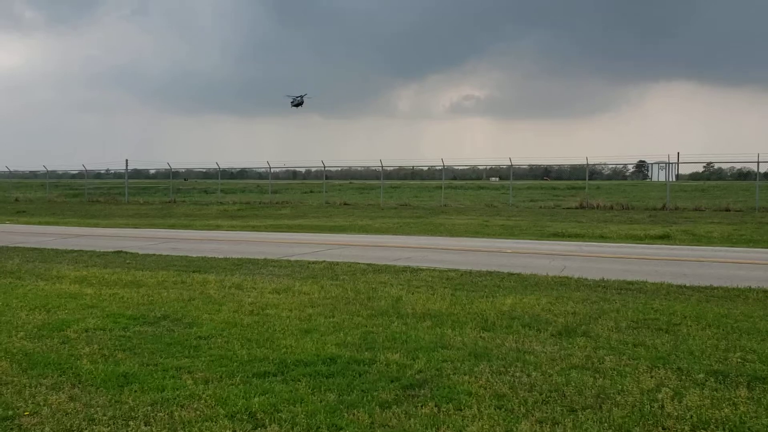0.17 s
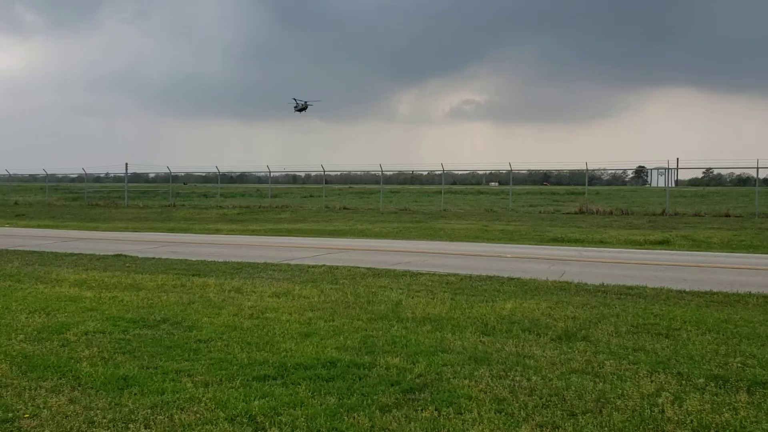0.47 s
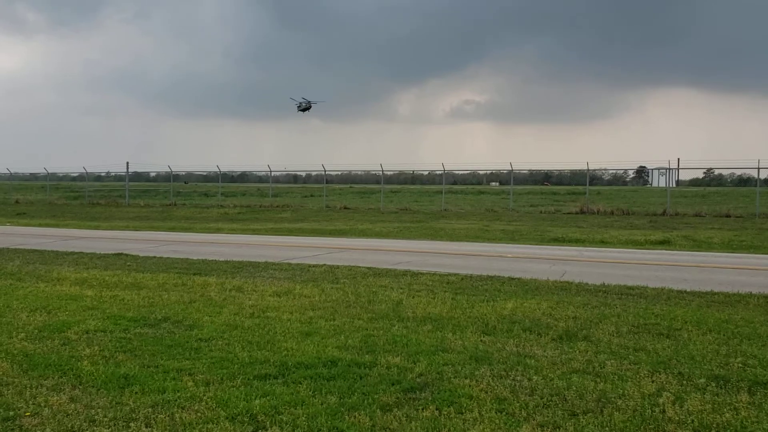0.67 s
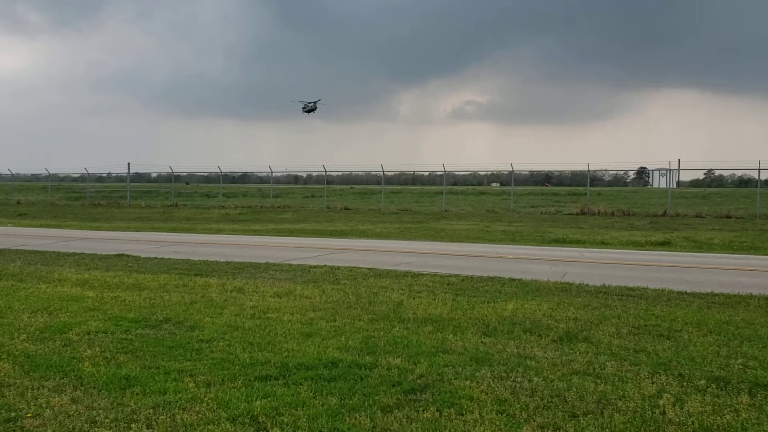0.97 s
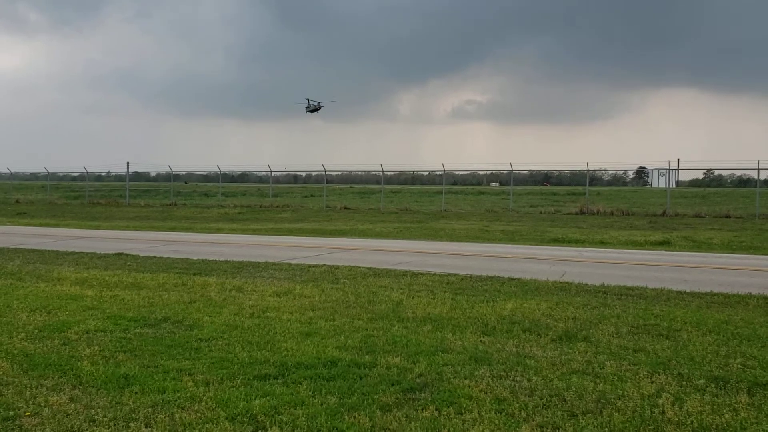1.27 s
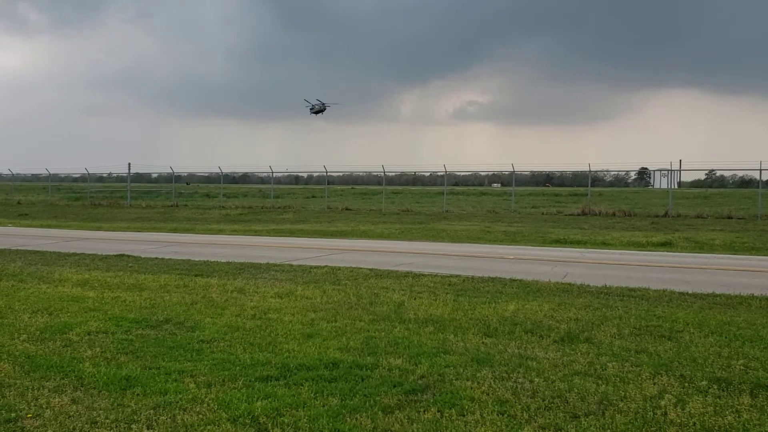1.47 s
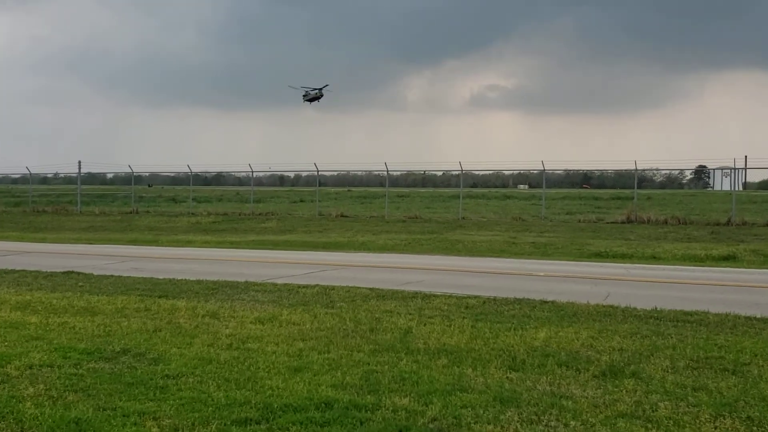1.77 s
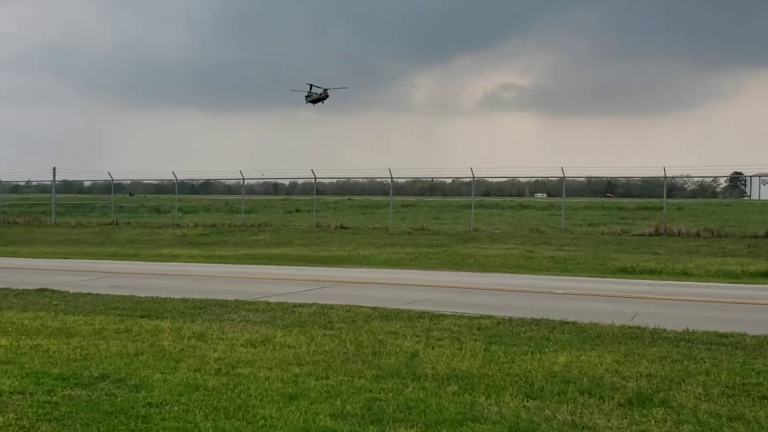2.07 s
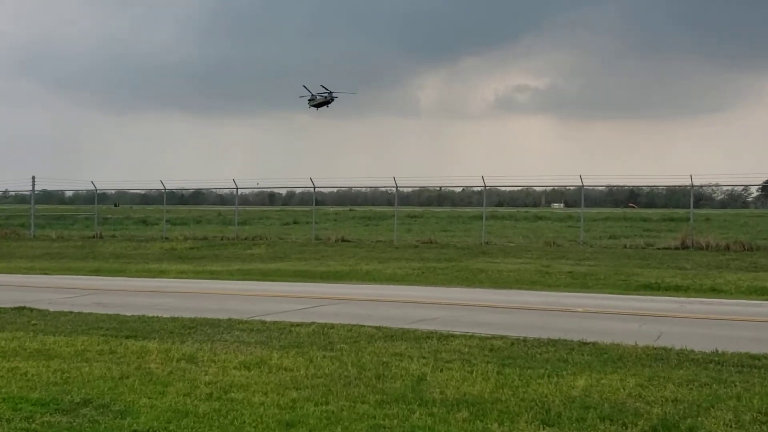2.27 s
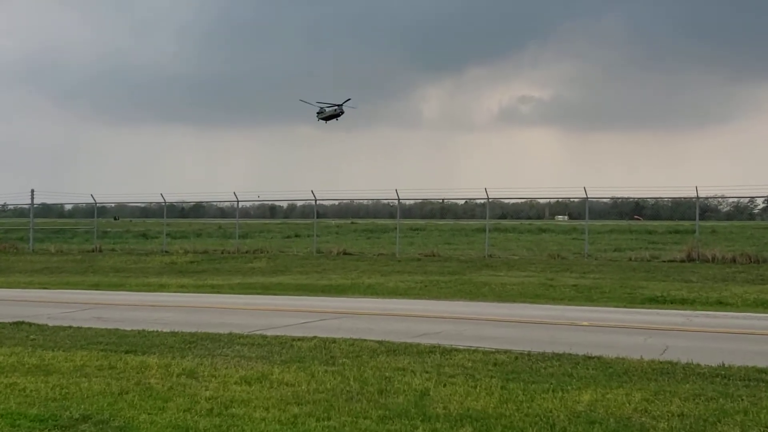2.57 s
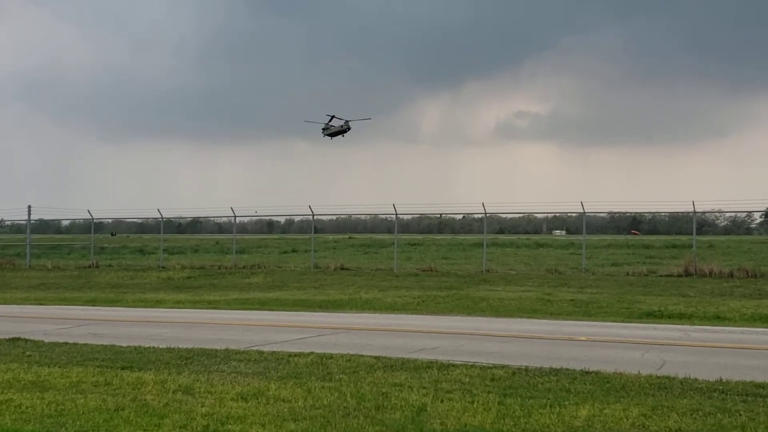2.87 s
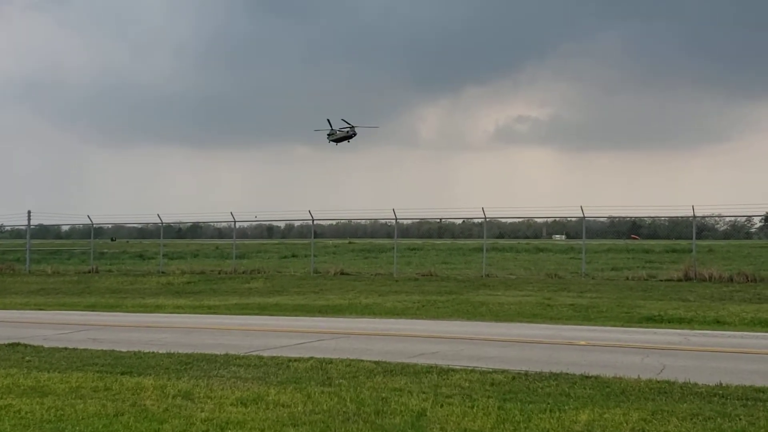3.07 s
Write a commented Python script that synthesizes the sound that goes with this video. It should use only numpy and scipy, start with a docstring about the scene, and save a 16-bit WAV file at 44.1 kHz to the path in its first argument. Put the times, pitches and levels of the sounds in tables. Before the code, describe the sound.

A twin-rotor helicopter approaches over an open airfield, its blades beating rapidly over a faint turbine roar. Wind buffets the microphone at first and keeps rumbling, while the engine whine and rotor slaps grow louder toward the end.

```python
"""A twin-rotor helicopter approaches across an open airfield, heard on a phone held in the wind.
Out on the field, blades slap the air about twelve times a second over turbine roar, gear tones and a
compressor whine. Low thuds reach both microphone ports; right at the phone, wind rumbles and buffets
each port, with a few thin ticks and a faint hiss. The sound starts abruptly."""
import sys
import numpy as np
from scipy import signal
from scipy.fft import rfft, irfft, next_fast_len
from scipy.io import wavfile
from scipy.ndimage import uniform_filter1d

SR = 44100
rng = np.random.default_rng(int(sys.argv[2]) if len(sys.argv) > 2 else 0)


def generate_wav(sig):
    """Save sig (samples, or channels by samples) to the path in sys.argv[1] as 16-bit PCM at SR."""
    pcm = np.round(np.clip(np.atleast_2d(sig).T, -1, 1) * 32767).astype(np.int16)
    wavfile.write(sys.argv[1], SR, pcm)


N = 141561
BLADE_HZ, BLADES = 11.8, 3  # blade passes a second, blades on a rotor
LEAD_S, ENGINE_LEAD_S = 6.5e-5, 5.2e-5  # the left port hears the helicopter first
START_S, TOP_HZ = .1055, 15750


def undb(db):
    """Gain of a level."""
    return 10 ** (np.asarray(db) / 20)


def curve(table, column):
    """One column of a table along time."""
    rows = np.array(table, float)
    return np.interp(np.arange(N) / SR, rows[:, 0], rows[:, column])


def walk(rate):
    """Random levels held 1 / rate s and slewed twice; spread 1."""
    hold = int(SR / rate)
    steps = np.repeat(rng.standard_normal(N // hold + 3), hold)
    smooth = uniform_filter1d(uniform_filter1d(steps, hold), hold)[hold:N + hold]
    return smooth / smooth.std()


def pan(db):
    """Left and right gains for a level difference."""
    return undb(np.array([db, -db]).reshape(2, -1) / 2)


def port_leads(lead_s):
    """Left and right time shifts for an arrival difference."""
    return lead_s * np.array([[.5], [-.5]])


def burst(age, rise, fall):
    """Envelope with a rounded rise and an exponential fall."""
    age = np.maximum(age, 0)
    return 2 * (1 - np.exp(-age / rise)) ** 2 * np.exp(-age / fall)


def bands(colour, alike, flicker_db, count, lead_s=LEAD_S):
    """Stereo noise as (centre Hz, band) pairs, each flickering; the ports share `alike` of the power."""
    size = next_fast_len(N)
    hz = np.maximum(np.arange(size // 2 + 1) * SR / size, 1)
    colour_hz, colour_db = np.array(colour, float).T
    log_hz, log_points = np.log(hz), np.log(colour_hz)
    white = rfft(rng.standard_normal((3, size)))
    shared = white[0] * np.exp(2j * np.pi * hz * port_leads(lead_s))
    spectrum = np.sqrt(alike) * shared + np.sqrt(1 - alike) * white[1:]
    spectrum *= undb(np.interp(log_hz, log_points, colour_db))
    spectrum /= irfft(spectrum, size).std()
    centres, step = np.linspace(log_points[0], log_points[-1], count, retstep=True)
    out = []
    for centre in centres:
        window = np.clip(1 - np.abs(log_hz - centre) / step, 0, 1)
        band = irfft(spectrum * window, size)[:, :N]
        out.append((np.exp(centre), band * undb(flicker_db * walk(14))))
    return out


def noise(colour, alike, flicker_db, count):
    """Coloured stereo noise: all its flickering bands together."""
    return sum(band for _, band in bands(colour, alike, flicker_db, count))


def narrow(hz, width_hz):
    """Noise crowded around a centre that may move, rms 1."""
    angle = 2 * np.pi * (np.cumsum(hz) / SR + hz * port_leads(LEAD_S))
    return walk(width_hz) * np.cos(angle) + walk(width_hz) * np.sin(angle)


def tone(hz, wander_hz, fade_db, fade_rate):
    """A tone that wavers and fades on its way through the air, reaching the left port first."""
    turns = np.cumsum(hz + wander_hz * walk(40)) / SR + rng.random()
    return undb(fade_db * walk(fade_rate)) * np.sin(2 * np.pi * (turns + hz * port_leads(ENGINE_LEAD_S)))


# colour of the turbine roar from across the field (frequency [Hz], level [dB])
ROAR_COLOUR = [(590, -9), (1000, -6), (1080, -28), (1200, -4), (1350, -12.5), (1520, -4.5), (1690, -6),
               (2100, -13.5), (2550, -19), (3100, -11.5), (3840, -9), (4730, -13.5), (6180, -21),
               (7400, -22), (8000, -20.5), (8600, -35.5), (11000, -37.5), (16000, -52)]
# dips and swells within the roar (time [s], level near 3.4 kHz [dB], level near 2.5 kHz [dB])
ROAR_SWELLS = [(.11, -2, -2.5), (1.3, 6, -6), (1.6, 1, -5), (2.0, 0, 2.5), (2.55, -4, 2), (2.72, -4, 2),
               (3.21, -1, -1.5)]
# bands where the roar crowds together (centre [Hz], width [Hz], level [dB])
ROAR_HUMS = [(1536, 200, -13), (1974, 100, -20), (2390, 220, -20), (2738, 230, -15.5), (3566, 250, -16),
             (3833, 560, -13)]
def roar(t):
    """Broad turbine noise with drifting hums in it, swelling with each blade."""
    upper, lower = curve(ROAR_SWELLS, 1), curve(ROAR_SWELLS, 2)
    swell_db = {6: lower, 7: lower, 8: upper}  # by band number
    parts = bands(ROAR_COLOUR, alike=.45, flicker_db=2.5, count=16, lead_s=ENGINE_LEAD_S)
    out = sum(band * undb(swell_db.get(k, 0)) for k, (_, band) in enumerate(parts))
    for hz, width_hz, db in ROAR_HUMS:
        level_db = db + 1.5 * walk(4.8) + (2200 < hz < 3000) * lower
        out += undb(level_db) * narrow(hz * (1 + .008 * walk(2)), width_hz)
    beat_db = 2 * np.cos(2 * np.pi * BLADE_HZ * (t - .004))
    return out * undb(beat_db)


def whine(hz=7684.5, skirt_hz=120):
    """The compressor's high tone inside a skirt of noise."""
    colour = [(20, -120), (hz - 4 * skirt_hz, -16), (hz - skirt_hz, -6), (hz, 0),
              (hz + skirt_hz, -7), (hz + 3 * skirt_hz, -30), (TOP_HZ, -120)]
    skirt = noise(colour, alike=.45, flicker_db=3.85, count=2)
    return undb(5) * tone(hz, wander_hz=2.5, fade_db=2.5, fade_rate=34.6) + undb(2) * skirt


# pitches of the gears (frequency [Hz])
GEAR_PITCHES = [1180, 1475.3, 1771.3, 1871.5, 2077, 2364, 3740]
# strength and waver of each of those pitches (level [dB], wander [Hz])
GEAR_TONES = [(-9.5, 3.9), (-3.5, 2.44), (-9, 3.7), (-10.5, 6), (-14, 2.9), (-12, 9.9), (-13, 12)]
def gears():
    """Gears sing in tones that each fade on their own across the field."""
    return sum(undb(db - 3) * tone(hz, wander_hz, fade_db=3, fade_rate=10.65)
               for hz, (db, wander_hz) in zip(GEAR_PITCHES, GEAR_TONES))


# the engines nearing the phone (time [s], roar level [dB], whine level [dB], gear level [dB])
ENGINE_APPROACH = [(0.11, -46, -51.5, -54), (0.13, -48, -66, -59), (0.28, -45.5, -60, -54),
                   (0.36, -49, -69, -61), (0.7, -48, -57.5, -72), (1.14, -50, -66.5, -70),
                   (1.29, -46.5, -58, -52), (1.58, -51.5, -64.5, -53.5), (1.65, -46.5, -56, -47),
                   (1.95, -43.5, -59, -46), (2.4, -42.5, -53.5, -48.5), (2.53, -40.5, -42.5, -43.5),
                   (2.69, -41.5, -55.5, -47.5), (2.72, -42, -54, -44), (2.84, -40.5, -51, -39.5),
                   (2.9, -41, -50, -36), (3.06, -38.5, -46.5, -36), (3.12, -43, -56, -48),
                   (3.15, -40, -49.5, -38), (3.21, -43, -58, -45)]
def turbines(t):
    """Roar, whine and gears grow unevenly louder as the helicopter closes in."""
    return (roar(t) * undb(curve(ENGINE_APPROACH, 1))
            + whine() * undb(curve(ENGINE_APPROACH, 2))
            + gears() * undb(curve(ENGINE_APPROACH, 3)))


# a moving band of the roar (time [s], centre [Hz], level [dB])
ROAR_SLIDE = [(2.55, 2464, -56), (2.68, 2340, -45), (2.8, 2000, -45), (2.9, 1600, -42), (3.06, 1481, -48),
              (3.21, 1470, -54)]
def sliding_roar():
    """A faint band of the roar that swells and slides down near the end."""
    return narrow(curve(ROAR_SLIDE, 1), width_hz=850) * undb(curve(ROAR_SLIDE, 2))


# rotor hiss reaching the phone (time [s], level [dB])
ROTOR_SWISH = [(.11, -74), (1.1, -72), (1.3, -68), (2.3, -71), (2.6, -65), (3.05, -60), (3.21, -62)]
def swish(t, hz=10400, width_hz=1200, width_s=.009):
    """High hiss that sweeps past once per rotor turn."""
    turn_s = BLADES / BLADE_HZ
    from_pass_s = (t - .003 + turn_s / 2) % turn_s - turn_s / 2
    sweep = np.exp(-.5 * (from_pass_s / width_s) ** 2)
    colour = [(20, -120), (hz - 2 * width_hz, -30), (hz - width_hz, -2),
              (hz + width_hz, -3), (hz + 2 * width_hz, -18), (TOP_HZ, -26)]
    return noise(colour, alike=.2, flicker_db=0, count=2) * sweep * undb(curve(ROTOR_SWISH, 1))


# colour of wind right on the microphone (frequency [Hz], level [dB])
RUMBLE_COLOUR = [(12, -41), (25, -9), (36, -3), (50, 3.5), (91, -2.5), (129, -3), (172, -6), (250, -6.5),
                 (360, -8.5), (424, -10.5), (841, -18.5), (1350, -34.5), (1950, -42), (3300, -100)]
# wind in the ports (time [s], level below 300 Hz [dB], left minus right [dB], level above 300 Hz [dB])
PORT_WIND = [(0.11, -32, -14.0, -81), (0.16, -22.5, -7.5, -77), (0.23, -32.5, -15.5, -44),
             (0.27, -21.5, -5.5, -42), (0.33, -22.5, 7, -40), (0.44, -27, -3, -36.5),
             (0.57, -30.5, 1.5, -41), (0.78, -32.5, 1.5, -41.5), (1.01, -33, 4.5, -47),
             (1.16, -30.5, 2, -40), (1.31, -29, 3.5, -44.5), (1.45, -29, -1, -45), (1.53, -38, 5.5, -49),
             (1.63, -35, -8, -49.5), (1.68, -31, 2, -41.5), (1.8, -32.5, -0.5, -42.5),
             (2.31, -31.5, 2, -48), (2.7, -34, 3.5, -42), (2.73, -31, -3, -46), (2.86, -35.5, 1, -40),
             (3.12, -27.5, -4, -37), (3.21, -35, 2.5, -36)]
# hard buffets, mostly on the right port (time [s], level [dB], left minus right [dB], decay [s])
PORT_BUFFETS = [(0.1, -27, -19.5, 0.018), (0.15, -19.5, -15.5, 0.0062), (0.2, -19, -18.5, 0.004),
                (0.226, -28.5, -15.5, 0.014), (0.25, -37, -7, 0.034), (0.29, -37, -3, 0.0079),
                (0.384, -44, 0, 0.0035), (1.453, -44, 0, 0.0065)]
def wind(t):
    """Wind rumbles on each port in its own quick gusts and buffets; the rumble throbs with the blades."""
    parts = bands(RUMBLE_COLOUR, alike=.33, flicker_db=1, count=10, lead_s=0)
    low = sum(band for hz, band in parts if hz <= 300)
    high = sum(band for hz, band in parts if hz > 300)
    low, high = low / low.std(), high / high.std()
    gusts = undb(3 * np.array([walk(22), walk(22)]))
    throb = np.cos(2 * np.pi * BLADE_HZ * (t + .002))
    rumble = low * undb(curve(PORT_WIND, 1) + throb) + high * undb(curve(PORT_WIND, 3) + 3 * throb)
    buffets = sum(pan(pan_db) * undb(db) * burst(t - at, rise=.0042, fall=decay)
                  for at, db, pan_db, decay in PORT_BUFFETS)
    return rumble * gusts * pan(curve(PORT_WIND, 2)) + buffets * (high + .5 * low)


# colour of the background hiss (frequency [Hz], level [dB])
HISS_COLOUR = [(6000, -38), (8500, -1.5), (11000, -4.5), (13000, -11), (16000, -11.5)]
def hiss():
    """Faint treble hiss that flickers behind everything."""
    return undb(-74) * noise(HISS_COLOUR, alike=.27, flicker_db=1.7, count=4)


# low thuds at the phone (time [s], level [dB], pitch [Hz], length [s], left minus right [dB])
LOW_THUDS = [(0.112, -15, 107, 0.029, -14), (0.16, -17, 100, 0.055, -1.5), (0.26, -16, 105.6, 0.058, 3),
             (0.322, -17, 77, 0.068, 12), (0.368, -21.5, 119, 0.03, -7), (0.413, -45, 94, 0.021, 0),
             (0.521, -9.5, 119, 0.018, 0.5), (0.613, -14, 81.4, 0.036, -2), (0.68, -24.5, 86, 0.042, -3),
             (0.722, -21, 78, 0.023, 0), (0.887, -29, 158, 0.027, -5), (0.935, -24.5, 132, 0.023, 6),
             (1.017, -32, 134.8, 0.13, 0), (1.19, -17.5, 105, 0.028, 6), (1.315, -20, 111, 0.023, -2),
             (1.357, -15, 79, 0.028, -1), (1.439, -26, 135, 0.0076, -19), (1.469, -26.5, 107, 0.022, -9),
             (1.791, -24, 100.4, 0.03, -3), (1.868, -25, 126, 0.0089, 14.5), (1.992, -22.5, 110, 0.049, -1),
             (2.05, -12.5, 82, 0.022, 1.5), (2.112, -27, 110, 0.052, -5), (2.144, -22, 104, 0.023, 2),
             (2.174, -24.5, 96, 0.03, -1), (2.213, -22, 104, 0.042, 1), (2.302, -18, 98, 0.011, -3),
             (2.361, -18, 92, 0.043, -0.8), (2.425, -22.5, 105, 0.031, -1), (2.463, -15, 94, 0.023, 3.5),
             (2.551, -20, 93.4, 0.042, -6), (2.639, -19, 86.6, 0.042, -1), (2.696, -18.5, 98, 0.037, -5),
             (2.798, -16.5, 104, 0.052, 1), (2.852, -19.5, 102, 0.011, -1), (2.891, -32.5, 95, 0.057, 21),
             (2.931, -20.5, 93, 0.028, 2.5), (2.979, -17, 74, 0.015, 1), (3.073, -15, 98, 0.046, -0.7),
             (3.141, -18, 113, 0.017, 0)]
def thuds(t, sag_per_s=4.76, skew_turns=.096):
    """A few cycles of low pressure, sagging in pitch, kinked and ragged, skewed between the ports."""
    out = 0
    for at, db, hz, length, pan_db in LOW_THUDS:
        age = t - at
        phase, kink = rng.random(2)
        skew = skew_turns * rng.uniform(-1, 1) * np.array([[1], [-1]])
        angle = 2 * np.pi * (hz * age * (1 - sag_per_s * age) + phase + skew)
        wave = np.cos(angle) + .29 * np.cos(2 * angle + 2 * np.pi * kink)
        envelope = np.exp(-.5 * (age / (.26 * length)) ** 2)
        out += pan(pan_db) * undb(db) * envelope * wave
    ragged = 1 + .41 * np.array([walk(150), walk(150)])
    return out * ragged


# blade slaps from across the field (time [s], level [dB])
BLADE_SLAPS = [(0.152, -29), (0.244, -31.5), (0.317, -35), (0.441, -50), (0.487, -37), (0.586, -31.5),
               (0.676, -35.5), (0.759, -36), (0.84, -37.5), (0.933, -34), (1.019, -31.5), (1.093, -38),
               (1.182, -37), (1.271, -58), (1.349, -33.5), (1.419, -37), (1.514, -40), (1.61, -35.5),
               (1.699, -39.5), (1.771, -33), (1.855, -25.5), (1.939, -44), (2.047, -31.5), (2.108, -34),
               (2.199, -30), (2.287, -32.5), (2.368, -30), (2.454, -35), (2.538, -25.5), (2.625, -31),
               (2.713, -23), (2.789, -28.5), (2.884, -26.5), (2.964, -26), (3.045, -25.5), (3.136, -27)]
# colour of a slap (frequency [Hz], level [dB])
BLADE_COLOUR = [(120, -31), (250, -1), (400, -4.5), (520, -11.5), (750, -1.5), (950, -10.5), (1200, -19.5),
                (3000, -32), (7000, -95)]
def blade_slaps(t, early_s=.015, churn_db=-19):
    """Each passing blade throws a soft burst of mid noise; the air churns on between them."""
    slaps = sum(undb(db) * burst(t - at + early_s, rise=.0073, fall=.013) for at, db in BLADE_SLAPS)
    churn = undb(churn_db + curve(BLADE_SLAPS, 1))
    air = noise(BLADE_COLOUR, alike=.77, flicker_db=1.07, count=7)
    crackle = undb(3 * walk(200))
    return undb(4) * np.hypot(slaps, churn) * air * crackle * pan(-.49)


# ticks and puffs close to the phone (time [s], level [dB], decay [s], lowest [Hz], highest [Hz])
CLOSE_TICKS = [(.4035, -36, .0012, 900, 2600), (.443, -46, .007, 3000, 8500),
               (2.4795, -52, .0004, 9000, 15500), (2.5555, -62, .003, 11500, 15500),
               (2.798, -52, .0004, 11500, 15500)]
def ticks(t):
    """Thin, brief bursts of noise, alike in both ports."""
    out = 0
    for at, db, decay, low_hz, high_hz in CLOSE_TICKS:
        passband = signal.butter(2, [low_hz, high_hz], "band", fs=SR, output="sos")
        air = signal.sosfilt(passband, rng.standard_normal(N))
        out += undb(db) * burst(t - at, rise=decay / 2, fall=decay) * air
    return out


def scene():
    """The helicopter over the field and wind on the phone, switched on abruptly."""
    t = np.arange(N) / SR
    helicopter = pan(-1) * (turbines(t) + sliding_roar() + swish(t))
    switch_on = np.clip((t - START_S) / .00065, 0, 1)
    return (helicopter + wind(t) + hiss() + thuds(t) + blade_slaps(t) + ticks(t)) * switch_on


def record(dry):
    """The phone cuts the top of the treble."""
    return signal.sosfilt(signal.ellip(10, .2, 80, TOP_HZ, fs=SR, output="sos"), dry)


dry = scene()
out = record(dry)
generate_wav(out)
```